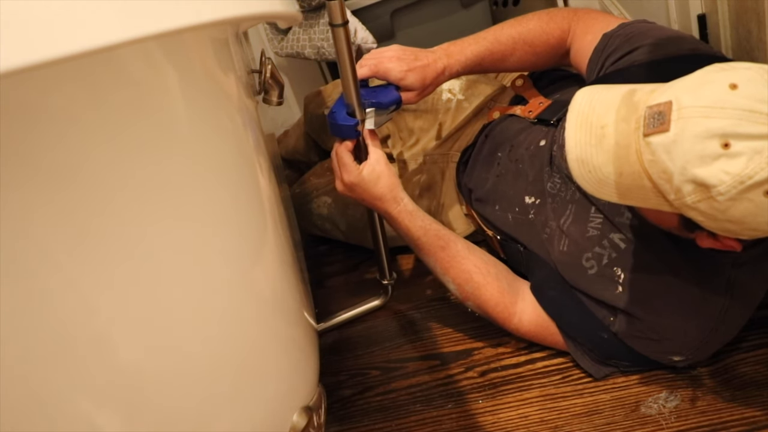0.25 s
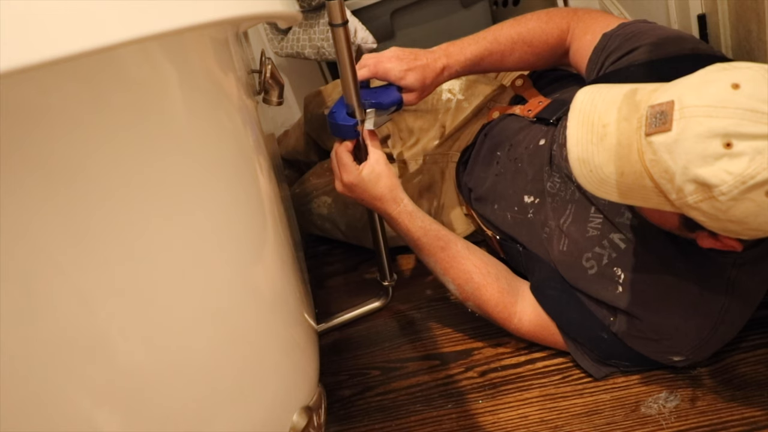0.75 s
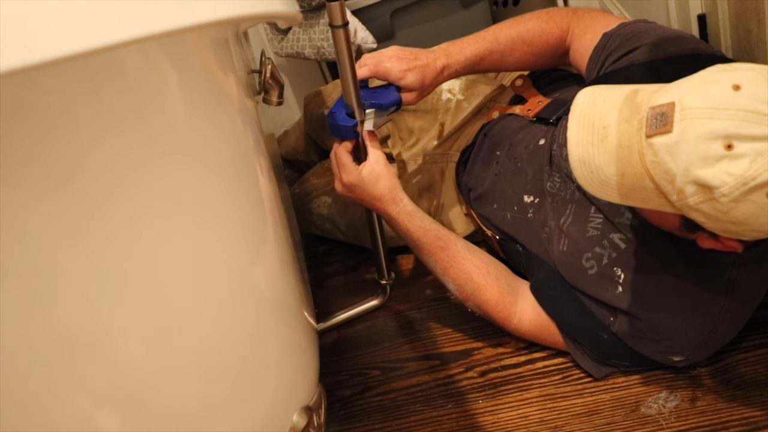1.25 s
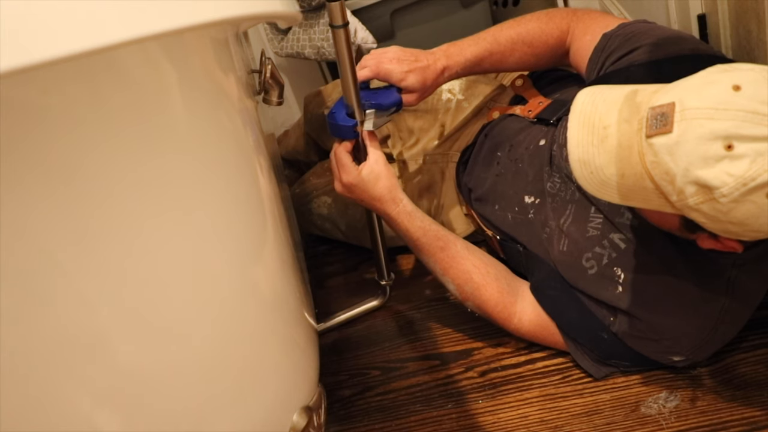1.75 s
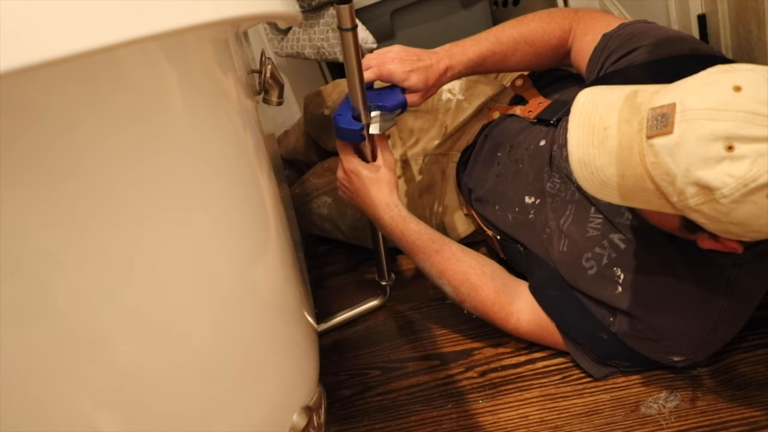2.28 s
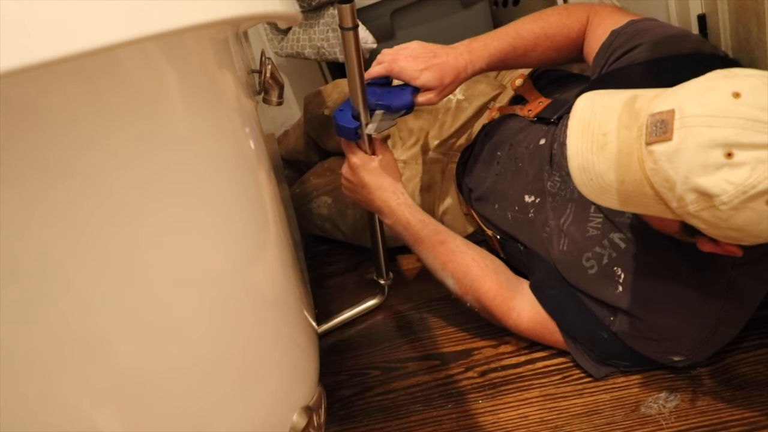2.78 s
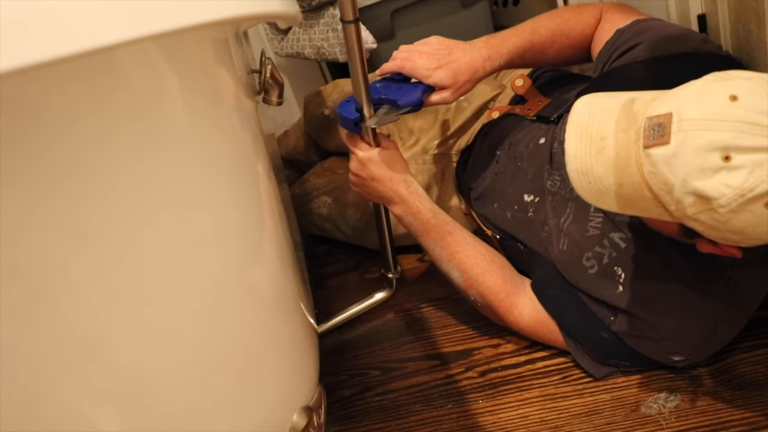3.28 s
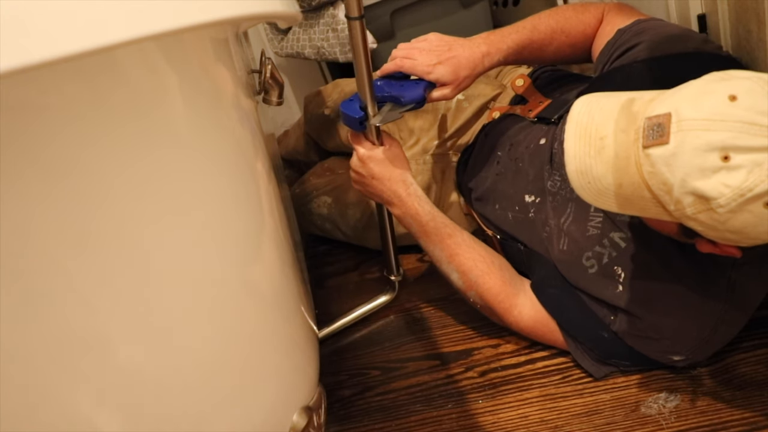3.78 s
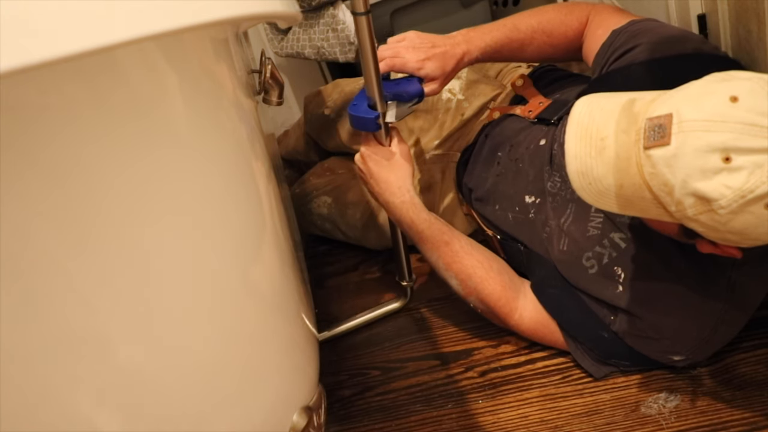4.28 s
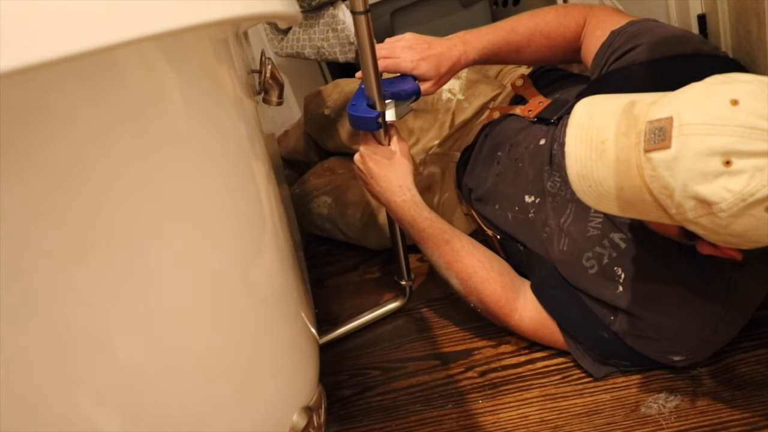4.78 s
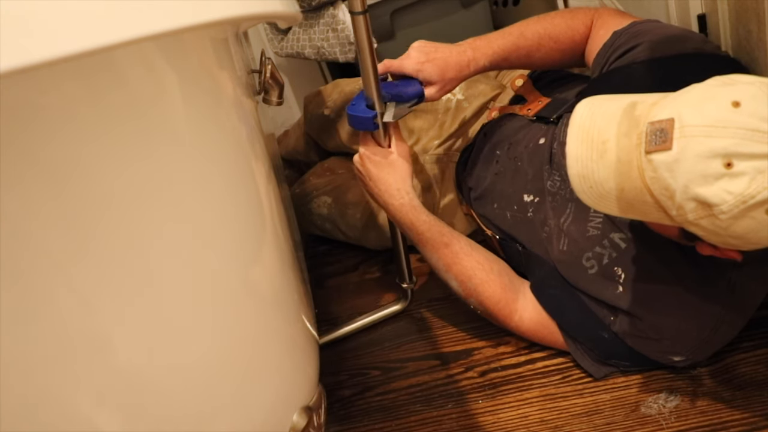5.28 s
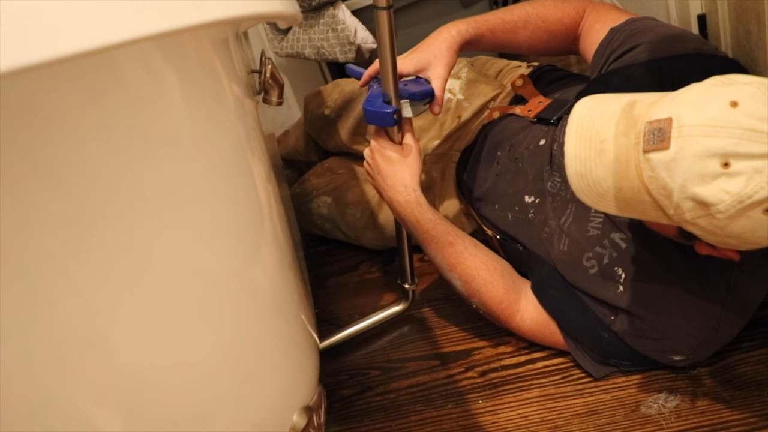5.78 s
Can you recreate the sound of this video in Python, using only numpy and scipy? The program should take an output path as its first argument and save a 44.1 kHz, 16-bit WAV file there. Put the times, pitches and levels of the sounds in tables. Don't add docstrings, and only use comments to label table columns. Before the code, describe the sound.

In a small hard room, a hand cutter scores a thin metal pipe. Gritty, ringing scrapes fill the first second, then only faint taps. Midway come hard hollow clunks against a tub and rapid jaw creaks, followed by a skid, a sharp pipe knock and small rattles. Ratchet clicks lead to a loud final bite. The microphone is about a metre away, with lively reverberation and faint hiss.

```python
import sys
import numpy as np
from scipy import signal
from scipy.fft import rfft, irfft, next_fast_len
from scipy.io import wavfile
from scipy.ndimage import uniform_filter1d

SR = 44100
rng = np.random.default_rng(int(sys.argv[2]) if len(sys.argv) > 2 else 0)


def convert_level_to_amplitude(level_db):
    exponent = np.asarray(level_db, float) / 20
    return 10 ** exponent


def int16_out(signal):
    q = np.round(np.clip(np.atleast_2d(signal).T, -1, 1) * 32767)
    wavfile.write(sys.argv[1], SR, q.astype(np.int16))


N = 266805

# start in seconds, grit in dB, rise in seconds, t60 in seconds, snap in dB.
FAR_COLOUR = [(300, -24), (593, -9), (735, -19.5), (1290, -8), (3280, 1.5), (10100, -12), (12500, -14),
              (15900, -36)]
FAR_RESONANCES = [(1166, 82, -1), (2005, 47, 3.5), (3500, 73, -3), (5710, 120, 1.5), (8500, 61, 0),
                  (11500, 200, -5)]
FAR_STROKES = [
    (0.0, -25.5, 0.00039, 0.53, -18.5),
]
PULL_COLOUR = [(300, -54), (500, -22.5), (930, -28.5), (1150, -11.5), (2430, -2), (3810, -3.5), (8310, -8),
               (15900, -23)]
PULL_RESONANCES = [(2520, 220, -1.5), (3720, 270, 2), (4560, 200, -3.5), (8220, 520, -3), (9740, 72, -8),
                   (14100, 140, -15)]
PULL_STROKES = [
    (0.381, -45, 0.0081, 0.086, -58),
    (0.395, -50, 0.00091, 0.033, -28),
    (.402, -18.5, 0.019, 0.75, -60),
    (0.641, -33, 0.0022, 0.089, -47),
]
CATCH_COLOUR = [(180, -21), (300, -12), (723, -22), (1250, -9), (2500, -7), (3700, 0.5), (5390, -14.5),
                (15900, -51)]
CATCH_RESONANCES = [(3120, 130, 0.5), (3800, 150, 1), (4200, 110, -2), (8400, 39, -15)]
CATCH_STROKES = [
    (.568, -24, 0.0017, 0.38, -52),
]
PUSH_COLOUR = [(300, -35), (883, -32.5), (1150, -19.5), (2920, -6.5), (4720, -10), (8200, -11),
               (10400, -18.5), (15900, -35)]
PUSH_RESONANCES = [(2930, 210, 2), (3400, 100, -2), (6640, 87, -14), (8670, 220, -3.5), (9160, 420, -2),
                   (11360, 400, -9.5)]
PUSH_STROKES = [
    (.750, -18, 0.023, 0.51, -49),
]
JOLT_COLOUR = [(180, -34), (300, -17), (447, -18.5), (1060, -15.5), (1480, -7.5), (2600, -14), (7270, -14),
               (15900, -22.5)]
JOLT_RESONANCES = [(3240, 200, 0), (4100, 35, -1), (5870, 60, -6), (8440, 240, 2), (10200, 97, -6)]
JOLT_STROKES = [
    (2.372, -34.5, 0.012, 0.22, -57),
]
SLIDE_COLOUR = [(240, -44), (400, -8), (905, -12.5), (1250, -5.5), (2830, -12), (4560, -15), (7940, -26),
                (15900, -35)]
SLIDE_RESONANCES = [(3110, 73, 1), (5200, 66, -18), (8600, 56, -10), (8680, 310, -11)]
SLIDE_STROKES = [
    (3.609, -46, 0.028, 0.53, -40.5),
]
CLUNK_COLOUR = [(150, -37), (351, 1), (600, -14), (1860, -6.5), (2530, -24), (3080, -19), (8820, -41),
                (15600, -94)]
CLUNK_RESONANCES = [(780, 100, -5.5), (1283, 25, -7), (1544, 80, -3), (1900, 72, -4.5), (3440, 140, -14.5),
                    (3980, 110, -12)]
CLUNK_STROKES = [
    (2.692, -22, 0.00095, 0.24, -6.5),
    (2.714, -23.5, 0.0017, 0.47, -18),
    (2.973, -21.5, 0.0021, 0.043, -17),
]
SKID_COLOUR = [(240, -50), (400, -12), (905, -13.5), (1250, -9), (2830, -11.5), (6000, -22.5),
               (8800, -18.5), (15900, -42)]
SKID_RESONANCES = [(2406, 24, -6), (3040, 67, 2), (4100, 45, -4), (5190, 40, -6), (8500, 45, -5),
                   (8775, 40, -2), (9049, 44, -7), (10240, 40, -14), (11140, 60, -20)]
SKID_STROKES = [
    (3.856, -38, 0.01, 0.57, -48),
    (4.039, -46, 0.0096, 0.22, -70),
]
PING_COLOUR = [(500, -50), (4000, -17), (6800, 0), (8500, -13), (9800, -2), (12000, -11), (15000, -14),
               (15900, -16)]
PING_RESONANCES = [(9600, 200, 4), (12000, 250, -4)]
PING_STROKES = [
    (4.001, -50, .001, .06, -34.5),
    (4.010, -55, .001, .05, -39),
]
BUMP_COLOUR = [(150, -20), (330, 1.5), (452, -13), (560, -9), (1390, -23), (3030, -21.5), (4200, -24),
               (7000, -120)]
BUMP_RESONANCES = [(355, 32, -11), (564, 33, -9), (1270, 43, -14)]
BUMP_STROKES = [
    (4.019, -35.5, 0.0019, 0.17, -19.5),
]
RATTLE_COLOUR = [(290, -24), (1050, -12.5), (1890, -4), (2800, -7), (4000, -6.5), (5500, -16), (8640, -21),
                 (15900, -37)]
RATTLE_RESONANCES = [(3050, 46, -18), (3950, 69, -7.5), (8600, 30, -2)]
RATTLE_STROKES = [
    (1.396, -51, 0.003, 0.15, -36),
    (1.764, -51.5, 0.006, 0.21, -62),
    (4.363, -37.5, 0.0012, 0.1, -29.5),
    (4.40, -36, 0.0064, 0.17, -61),
    (4.463, -42, 0.0017, 0.06, -30),
    (4.765, -54, .001, 0.13, -37.5),
    (4.831, -52, 0.011, 0.2, -57),
]
SEAT_COLOUR = [(300, -27), (1170, -24), (1360, -10), (3020, -5), (4000, -7.5), (5220, 0), (9810, -13),
               (15900, -30)]
SEAT_RESONANCES = [(1930, 140, -3), (2520, 60, -2), (3030, 60, 2), (3490, 50, 5), (5300, 150, -2),
                   (6420, 69, 1), (9340, 110, 0)]
SEAT_STROKES = [
    (5.209, -25.5, 0.015, 0.22, -60),
]
CLICK_COLOUR = [(290, -66), (1000, -25), (1600, -12.5), (2390, -9.5), (3960, -1.5), (4640, -6), (8770, -15),
                (15900, -36)]
CLICK_RESONANCES = [(2430, 360, -3.5), (3900, 110, 2), (5000, 110, -5), (7000, 240, -10), (8700, 170, -8.5)]
CLICK_STROKES = [
    (5.301, -31, 0.035, 0.53, -10),
]
CLACK_COLOUR = [(240, -67), (606, -13.5), (850, -37), (1090, -18), (2460, -3.5), (3800, -13), (6400, -20),
                (15900, -44)]
CLACK_RESONANCES = [(1110, 116, -7.5), (1740, 180, -5), (2370, 210, -2), (3200, 81, -1.5), (6400, 130, -22)]
CLACK_STROKES = [
    (5.513, -33, 0.034, 0.2, -13.5),
]
CUT_COLOUR = [(300, -55), (405, -31.5), (1060, -25.5), (1150, -13.5), (1990, -7.5), (3680, -9.5),
              (10500, -21), (15900, -36)]
CUT_RESONANCES = [(2015, 136, 1), (3700, 330, -6.5), (6600, 200, -14), (7760, 280, -11.5), (9130, 110, -9),
                  (10340, 140, -12)]
CUT_STROKES = [
    (5.900, -18.5, 0.016, 1, -60),
    (5.924, -10.5, 0.0029, 0.015, -18),
]
CONTACTS = [
    (FAR_COLOUR, FAR_RESONANCES, FAR_STROKES), (PULL_COLOUR, PULL_RESONANCES, PULL_STROKES),
    (CATCH_COLOUR, CATCH_RESONANCES, CATCH_STROKES), (PUSH_COLOUR, PUSH_RESONANCES, PUSH_STROKES),
    (JOLT_COLOUR, JOLT_RESONANCES, JOLT_STROKES), (SLIDE_COLOUR, SLIDE_RESONANCES, SLIDE_STROKES),
    (CLUNK_COLOUR, CLUNK_RESONANCES, CLUNK_STROKES), (SKID_COLOUR, SKID_RESONANCES, SKID_STROKES),
    (PING_COLOUR, PING_RESONANCES, PING_STROKES), (BUMP_COLOUR, BUMP_RESONANCES, BUMP_STROKES),
    (RATTLE_COLOUR, RATTLE_RESONANCES, RATTLE_STROKES), (SEAT_COLOUR, SEAT_RESONANCES, SEAT_STROKES),
    (CLICK_COLOUR, CLICK_RESONANCES, CLICK_STROKES), (CLACK_COLOUR, CLACK_RESONANCES, CLACK_STROKES),
    (CUT_COLOUR, CUT_RESONANCES, CUT_STROKES)]
STOP_SHARE = 0.82

# start in seconds, tick peak in dB, ring in dB above the tick.
PIPE_TAPS = [
    (1.3424, -54, -13),
    (1.3963, -39.5, -19),
    (1.4316, -49, -22),
    (1.8483, -42.5, -26),
    (2.693, -28.5, -19.5),
    (4.1671, -18, -18),
    (4.363, -40.5, -12),
    (4.4077, -41, -7),
]
# frequency in Hz, level in dB per Hz.
TICK_COLOUR = [(350, -44), (600, 2.5), (2150, -7.5), (3020, 0), (6600, -10), (7570, -14), (8450, -2.5),
               (15900, -26)]
# frequency in Hz, level in dB, t60 in seconds.
PIPE_MODES = [(1720, -14, 0.46), (3060, 1.5, 0.5), (3120, -27, 0.65), (3390, -5, 0.5), (4043, -16, .2),
              (5800, -23, 0.17), (8350, 4, 0.38), (8600, -24, 0.38), (9490, -12, 0.2), (10300, -10, 0.35),
              (11000, -31, 0.35)]
# start in seconds, level in dB.
PIPE_HUMS = [
    (.42, -30),
    (0.766, -42),
    (2.692, -50),
    (4.167, -37.5),
    (5.22, -45),
]
# frequency in Hz, level in dB, t60 in seconds.
FREE_PIPE_MODES = [(2990, 0, 1.7)]
# start in seconds, level in dB.
PAWL_HITS = [
    (5.514, -21.5),
]
# frequency in Hz, level in dB, t60 in seconds.
PAWL_MODES = [(1106, -7, .07), (1690, -11, 0.045), (2390, 5, 0.03), (3200, -2, 0.043), (3700, 0.5, .035),
              (6500, -21, .05)]
# start in seconds, level in dB.
JAW_CLINKS = [
    (2.379, -39),
    (2.384, -50),
]
# frequency in Hz, level in dB, t60 in seconds.
JAW_MODES = [(1450, -4, 0.11), (3010, -7, 0.26), (3510, 3.5, 0.076), (4170, -6.5, 0.25), (5680, 0, 0.087),
             (8470, -0.5, 0.17), (9800, -11, 0.11)]
# start in seconds, level in dB.
ROLLER_HITS = [
    (3.866, -50),
    (3.874, -48),
    (3.889, -49),
    (3.905, -49),
    (3.921, -48),
    (3.943, -51),
    (4.02, -53),
    (4.047, -51),
    (4.065, -54),
]
# frequency in Hz, level in dB, t60 in seconds.
ROLLER_MODES = [(3090, -5, 0.17), (4070, -8, .2), (5190, -7, .2), (8522, 0, .25), (8775, -5, .25),
                (9049, -3.5, .2), (10240, -10, .2)]

# start in seconds, peak in dB, pitch in Hz, t60 in seconds.
TUB_THUMPS = [(0.046, -36, 214, 0.093), (0.572, -43.5, 287, 0.31), (1.385, -38.5, 218, 0.1),
              (1.842, -46, 119, 0.17), (2.384, -37.5, 267, 0.1), (2.69, -17.5, 252, 0.32),
              (2.824, -19.5, 177, 0.1), (2.876, -21.5, 248, 0.13), (2.972, -16, 274, 0.051),
              (3.862, -35.5, 290.5, 0.33), (4.019, -23.5, 255, 0.17), (4.167, -19, 192.7, 0.14),
              (4.381, -19.5, 189, 0.08), (4.401, -32, 222, 0.28), (4.683, -28, 179, 0.18),
              (4.89, -48, 186.5, 0.38), (4.958, -45, 204.4, 0.33), (5.163, -43.5, 200, 0.12)]
# start in seconds, bend in seconds, peak in dB, from Hz, to Hz.
WALL_FLEXES = [
    (5.332, 0.014, -40, 180, 205),
    (5.36, 0.073, -35.5, 204.6, 234),
    (5.371, 0.059, -46, 335, 350),
]
SHELL_HZ, SHELL_DB, SHELL_T60_S = 231.7, -12.5, 0.43
# start in seconds, level in dB.
WALL_CLANGS = [
    (2.692, -21),
    (2.715, -24.5),
]
# frequency in Hz, level in dB, t60 in seconds.
WALL_MODES = [(290, -4.5, 0.24), (350, -2, .3), (641, -8, .3), (783, 3, 0.25), (1024, -18, 0.28),
              (1264, -8, .3), (1463, -3, 0.18), (1505, -9, 0.48), (1803, -15, .4), (1930, -2.5, 0.17)]
# start in seconds, level in dB.
RIM_KNOCKS = [
    (2.973, -27.5),
]
# frequency in Hz, level in dB, t60 in seconds.
RIM_MODES = [(231, -5, 0.41), (350, -1.5, 0.34), (774, 2, 0.24), (1254, -11, 0.49), (1550, -4, 0.11),
             (1850, -14, 0.31)]

# start in seconds, peak in dB.
JAW_CREAKS = [(2.591, -42), (2.603, -41), (2.612, -38), (2.6256, -39), (2.6383, -39), (2.6585, -36),
              (2.6673, -36), (2.68, -40), (2.7597, -29.5), (2.9544, -40), (2.9952, -35), (3.0102, -36),
              (3.028, -35), (3.049, -32.5), (3.062, -34), (3.078, -32), (3.096, -33.5), (3.141, -35.5),
              (3.1624, -32.5), (3.174, -34), (3.186, -32), (3.1967, -36), (3.206, -36), (3.2462, -39),
              (3.279, -45), (3.307, -41), (3.3206, -34.5), (3.3352, -32.5), (3.343, -44), (3.376, -32.5),
              (3.425, -44), (3.442, -38), (3.457, -35), (3.479, -35.5), (3.496, -41)]
# frequency in Hz, level in dB per Hz.
CREAK_COLOUR = [(900, -41), (2000, -1.5), (3500, -1), (4500, -7.5), (6500, -9.5), (9500, -12.5),
                (12000, -20), (15900, -32)]
# frequency in Hz, width in Hz, level in dB.
CREAK_RESONANCES = [(2400, 70, 8.5), (3160, 110, 4), (3790, 73, 5.5), (5220, 93, -3), (7900, 150, -5),
                    (8660, 220, 2)]

# start in seconds, hold in seconds, rub in dB, tub rumble in dB.
HAND_DRAGS = [(1.28, 0.039, -51, -56.5), (1.72, 0.045, -53.5, -63), (2.18, .04, -57, -80),
              (2.584, 0.15, -39.5, -48), (2.74, 0.13, -35, -56), (2.877, 0.21, -38, -35),
              (3.15, 0.26, -39.5, -42), (3.895, 0.023, -38.5, -54), (4.063, 0.2, -43, -42),
              (4.373, 0.038, -41.5, -43), (4.5, 0.34, -50, -54), (5.167, 0.072, -53, -62)]
DRAG_RISE_DB_S, DRAG_FALL_DB_S = 212, 97
# frequency in Hz, level in dB per Hz.
RUB_COLOUR = [(290, -73), (668, -17.5), (1280, -1.5), (2420, -6), (3420, -7.5), (4510, -13.5),
              (8640, -15.5), (15900, -34)]
# frequency in Hz, width in Hz, level in dB.
RUB_RESONANCES = [(2423, 42, 7), (3080, 53, 4), (3260, 98, 1), (3690, 240, -1.5), (5160, 41, 8),
                  (8750, 440, -5)]
# frequency in Hz, level in dB per Hz.
RUMBLE_COLOUR = [(60, -42), (160, -12), (230, 2.0), (380, -7.0), (700, -21.5), (1500, -48)]

# frequency in Hz, t60 in seconds.
ROOM_T60 = [(150, 0.42), (1000, 0.76), (3000, 0.63), (8000, 0.49), (14000, 0.25)]
ROOM_DB, ROOM_GAP_S = -1.94, 0.0023
NEAR_SEND_DB = -6
# frequency in Hz, level in dB per Hz.
AIR_COLOUR = [(30, -70), (106, 2.5), (198, -1), (1250, -6.5), (3200, -3.5), (4870, -11), (12200, -17),
              (15900, -30)]
AIR_DB = -53


def unit(x):
    return x / np.sqrt(np.mean(x ** 2))


def add(out, s, x):
    i = int(s * SR)
    out[i:i + len(x)] += x[:N - i]


def fade(t, t60):
    return convert_level_to_amplitude(-60 * t / max(t60, .001))


def filtered(x, kind, order, hz):
    return signal.sosfilt(signal.butter(order, hz, kind, fs=SR, output="sos"), x)


def colour(x, points, peaks=(), lift_db=0.1, most_db=5):
    f = np.fft.rfftfreq(len(x), 1 / SR)
    hz, db = np.transpose(points)
    power = convert_level_to_amplitude(2 * np.interp(np.log(f + 1), np.log(hz), db))
    for peak_hz, width, peak_db in peaks:
        ceiling = convert_level_to_amplitude(2 * most_db) * power[int(peak_hz * len(x) / SR)]
        top = min(convert_level_to_amplitude(2 * (peak_db + lift_db)), ceiling)
        power += top / (1 + ((f - peak_hz) / width) ** 2) ** 2
    cepstrum = irfft(np.log(power / np.mean(power)) / 2, len(x))
    cepstrum[1:len(x) // 2] *= 2
    cepstrum[len(x) // 2 + 1:] = 0
    return irfft(rfft(x) * np.exp(rfft(cepstrum)), len(x))


def grit(count, scatter_db):
    return unit(rng.standard_normal(count) * convert_level_to_amplitude(scatter_db * rng.exponential(size=count)))


def snap(size):
    places = np.linspace(0, 63, size // 2 + 1)
    delay_s = 0.000407 + 0.001556 * np.interp(places, np.arange(64), rng.exponential(size=64))
    phase = 2 * np.pi * np.cumsum(delay_s) * SR / size
    crack = np.sqrt(SR / 1000) * irfft(np.exp(-1j * phase), size)
    return crack * (np.arange(size) < size // 2)


def ring(times, levels_db, modes, scatter_db):
    out = np.zeros(N)
    at = (np.array(times) * SR).astype(int)
    chance = rng.standard_normal((len(at), 2 * len(modes)))
    for k, (hz, db, t60) in enumerate(modes):
        blow = np.zeros(N)
        strength = convert_level_to_amplitude(np.array(levels_db) + db + scatter_db * chance[:, k])
        blow[at] = strength * np.sign(chance[:, -1 - k])
        pole = np.exp(2j * np.pi * hz / SR - np.log(1000) / (t60 * SR))
        out += signal.lfilter([1], [1, -pole], blow).imag
    return out


def wheel():
    out, t = np.zeros(N), np.arange(32768) / SR
    rebound = convert_level_to_amplitude(-5)
    for points, peaks, strokes in CONTACTS:
        for s, grit_db, rise, t60, snap_db in strokes:
            late = np.maximum(t - rise, 0) / t60
            slowing = convert_level_to_amplitude(-60 * (late ** 0.93 + (late / STOP_SHARE) ** 4))
            slips = convert_level_to_amplitude(grit_db) * np.minimum(t / rise, 1) * slowing * grit(len(t), 0.98)
            cracks = snap(len(t)) + rebound * np.roll(snap(len(t)), 90)
            stroke = slips + convert_level_to_amplitude(snap_db) * cracks
            add(out, s, colour(stroke, points, peaks, lift_db=0, most_db=12))
    return out


def taps():
    out, t = np.zeros(N), np.arange(4096) / SR
    for at, tick_db, _ in PIPE_TAPS:
        tick = convert_level_to_amplitude(tick_db - 5.5) * fade(t, 0.03) * rng.standard_normal(len(t))
        add(out, at, colour(tick, TICK_COLOUR))
    return out


def pipe():
    s, tick_db, ring_db = np.transpose(PIPE_TAPS)
    out = convert_level_to_amplitude(3.0) * ring(s, tick_db + ring_db, PIPE_MODES, 0.67)
    out += ring(*np.transpose(PIPE_HUMS), FREE_PIPE_MODES, 0)
    out += ring(*np.transpose(PAWL_HITS), PAWL_MODES, 0)
    out += convert_level_to_amplitude(2.0) * ring(*np.transpose(JAW_CLINKS), JAW_MODES, 1)
    out += ring(*np.transpose(ROLLER_HITS), ROLLER_MODES, 2)
    return out


def thumps():
    out, t = np.zeros(N), np.arange(16384) / SR
    shell = convert_level_to_amplitude(SHELL_DB) * fade(t, SHELL_T60_S) * np.sin(2 * np.pi * SHELL_HZ * t)
    for at, peak_db, hz, t60 in TUB_THUMPS:
        push_s = 0.0035 * convert_level_to_amplitude(-0.35 * (peak_db + 18))
        push = np.sin(np.minimum(t / push_s, 1) * np.pi / 2) ** 2
        trio = np.sin(2 * np.pi * hz * t)
        trio += 0.56 * np.sin(2 * np.pi * 1.28 * hz * t)
        trio += 0.81 * np.sin(2 * np.pi * 0.875 * hz * t)
        add(out, at, convert_level_to_amplitude(peak_db - 1.5) * push * (fade(t, t60) * trio + shell))
    return out


def flexes():
    out, t = np.zeros(N), np.arange(16384) / SR
    for at, bend, peak_db, from_hz, to_hz in WALL_FLEXES:
        hz = from_hz + (to_hz - from_hz) * np.minimum(t / bend, 1)
        wobble = convert_level_to_amplitude(3.1 * unit(uniform_filter1d(rng.standard_normal(len(t)), size=400)))
        shape = np.minimum(t / 0.0041, 1) * fade(np.maximum(t - bend, 0), .06) * wobble
        add(out, at, convert_level_to_amplitude(peak_db) * shape * np.sin(2 * np.pi * np.cumsum(hz) / SR))
    return out


def tub():
    return filtered(thumps() + flexes(), "high", 2, 110)


def tub_wall():
    clangs = ring(*np.transpose(WALL_CLANGS), WALL_MODES, 0)
    return clangs + ring(*np.transpose(RIM_KNOCKS), RIM_MODES, 0)


def jaw():
    out, t = np.zeros(N), np.arange(4096) / SR
    for at, creak_db in JAW_CREAKS:
        tick = convert_level_to_amplitude(creak_db + 1.0) * fade(t, 0.038) * rng.standard_normal(len(t))
        add(out, at, colour(tick, CREAK_COLOUR, CREAK_RESONANCES, lift_db=0.5, most_db=10))
    return out


def hands():
    t, size = np.arange(N) / SR, next_fast_len(N + 1, True) // 2 * 2
    rub_gain, low_gain = np.zeros(N), np.zeros(N)
    for s, hold, rub_db, low_db in HAND_DRAGS:
        rise_db = -DRAG_RISE_DB_S * np.maximum(s - t, 0)
        fall_db = -DRAG_FALL_DB_S * np.maximum(t - s - hold, 0)
        shape = convert_level_to_amplitude(rise_db + fall_db)
        rub_gain = np.maximum(rub_gain, convert_level_to_amplitude(rub_db) * shape)
        low_gain = np.maximum(low_gain, convert_level_to_amplitude(low_db) * shape)
    grip = np.repeat(rng.standard_normal(size // 700 + 1), 700)[:size]
    patchy = convert_level_to_amplitude(3.0 * unit(uniform_filter1d(grip, size=300)))
    slips = unit(grit(size, 1.5) * patchy)
    rub = colour(slips, RUB_COLOUR, RUB_RESONANCES, lift_db=4.0, most_db=8.0)[:N]
    rumble = colour(slips, RUMBLE_COLOUR)[:N]
    return convert_level_to_amplitude(-7.0) * (rub_gain * rub + low_gain * rumble)


def room(x, near):
    t = np.arange(26000) / SR
    room_hz, room_t60 = np.transpose(ROOM_T60)
    tail = np.zeros(len(t))
    for hz in 100 * 2. ** np.arange(8):
        octave = [hz / np.sqrt(2), hz * np.sqrt(2)]
        band = filtered(rng.standard_normal(len(t)), "band", 2, octave)
        tail += band * fade(t, np.interp(np.log(hz), np.log(room_hz), room_t60))
    tail *= np.clip(t / ROOM_GAP_S - 1, 0, 1) * convert_level_to_amplitude(-30 * (t / 0.44) ** 2)
    tail /= np.sqrt(np.sum(tail ** 2))
    send = x + convert_level_to_amplitude(NEAR_SEND_DB) * near
    return x + near + convert_level_to_amplitude(ROOM_DB) * signal.fftconvolve(send, tail)[:N]


def air():
    return convert_level_to_amplitude(AIR_DB) * colour(rng.standard_normal(2 ** 19), AIR_COLOUR)[:N]


def scene():
    broad = wheel() + taps() + hands()
    near = jaw() + tub_wall() + tub()
    return (room(broad, near) + pipe() + air())[None]


def top_cut(x):
    return signal.sosfilt(signal.butter(12, 16020, fs=SR, output="sos"), x)


def record(dry):
    heard = filtered(dry, "high", 4, 100)
    rounded = heard / (1 + (heard / .6) ** 4) ** .25
    return top_cut(rounded)


dry = scene()
out = record(dry)
int16_out(out)
```